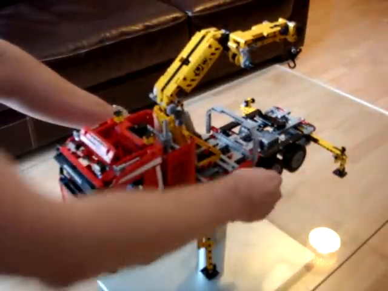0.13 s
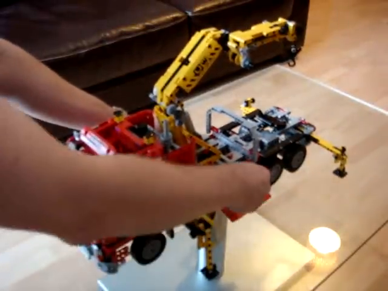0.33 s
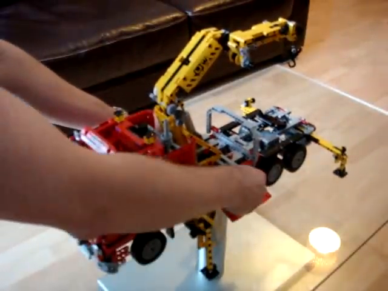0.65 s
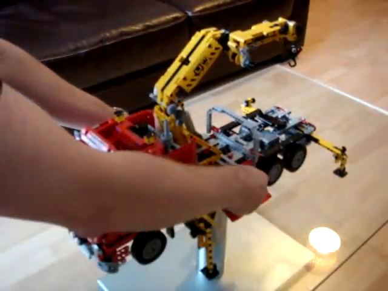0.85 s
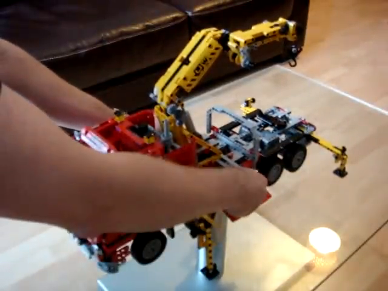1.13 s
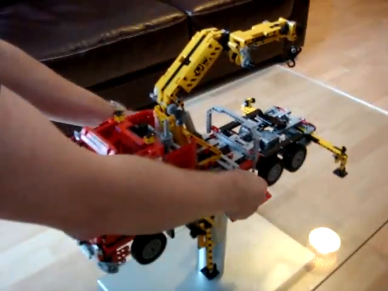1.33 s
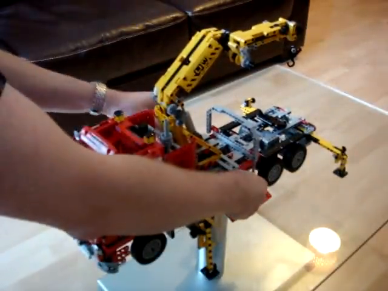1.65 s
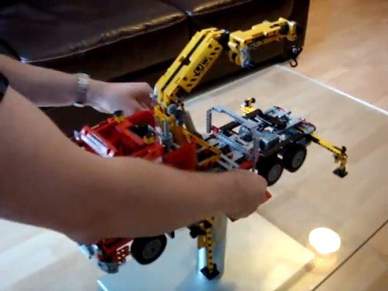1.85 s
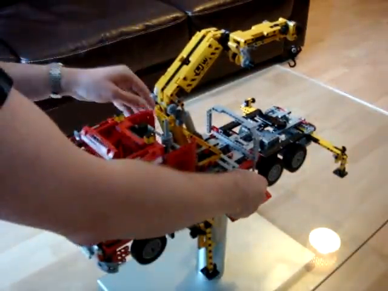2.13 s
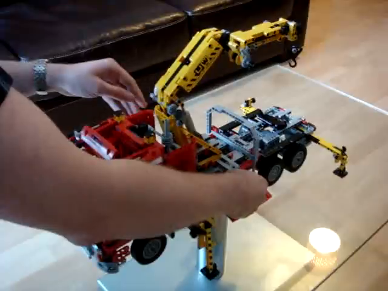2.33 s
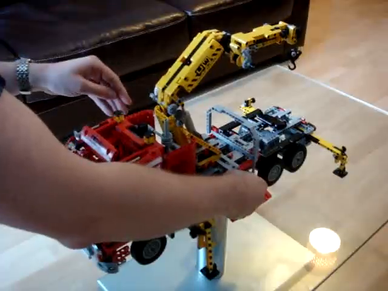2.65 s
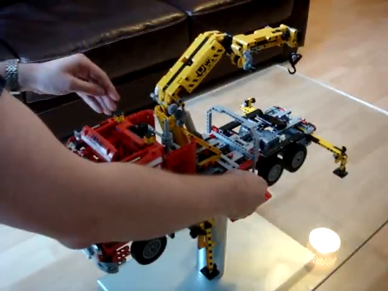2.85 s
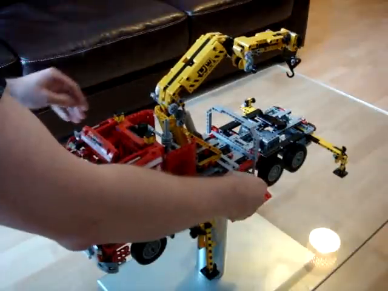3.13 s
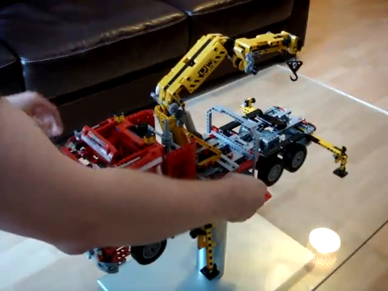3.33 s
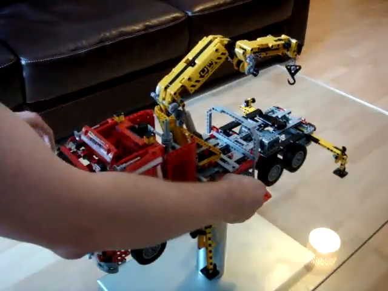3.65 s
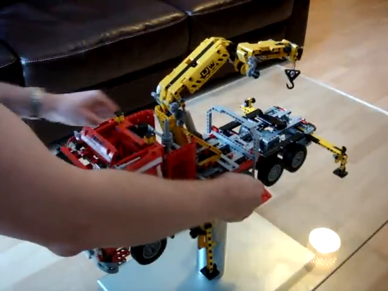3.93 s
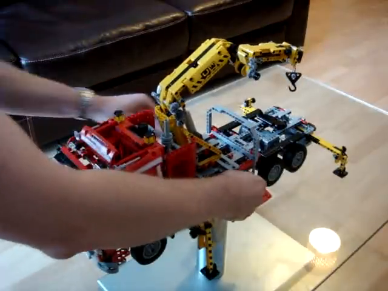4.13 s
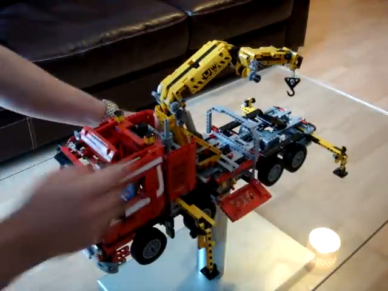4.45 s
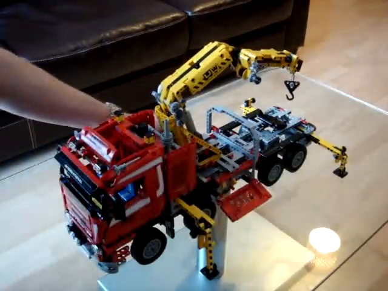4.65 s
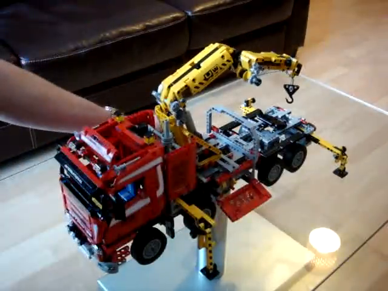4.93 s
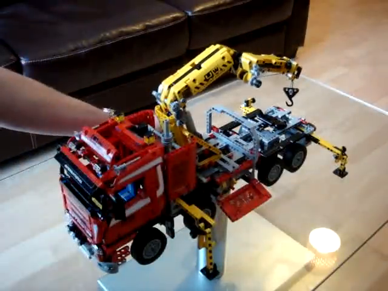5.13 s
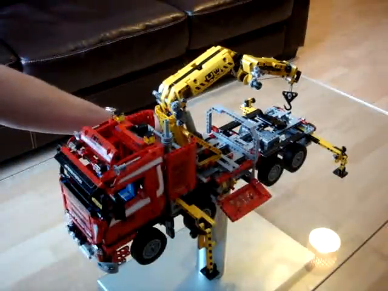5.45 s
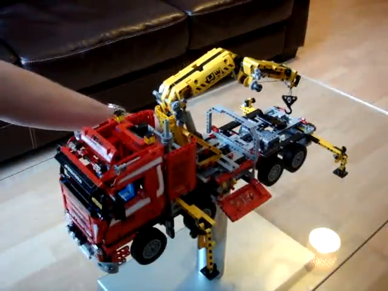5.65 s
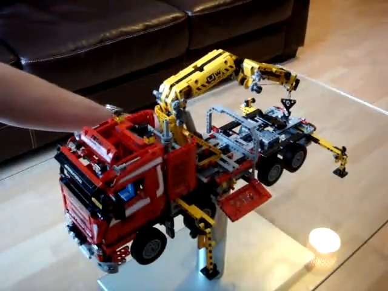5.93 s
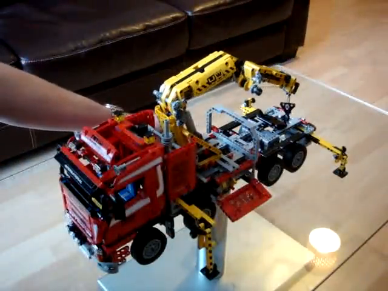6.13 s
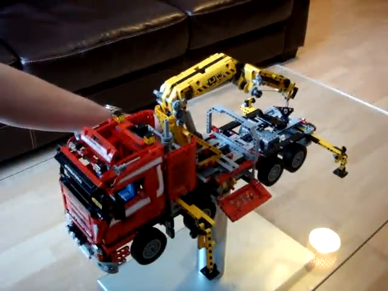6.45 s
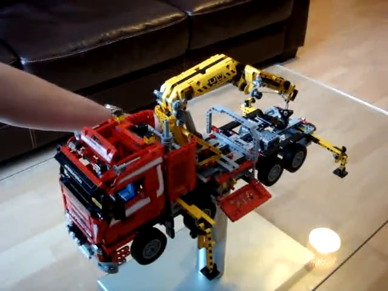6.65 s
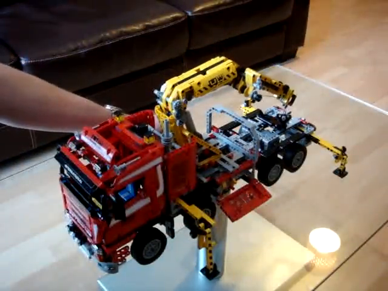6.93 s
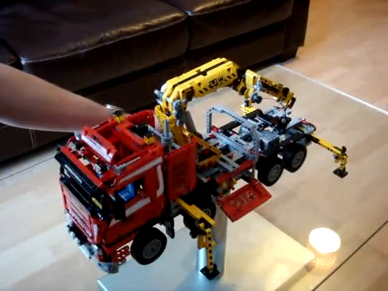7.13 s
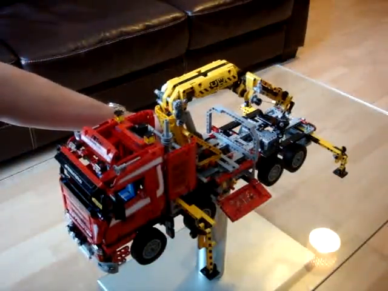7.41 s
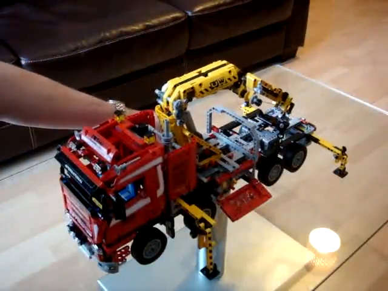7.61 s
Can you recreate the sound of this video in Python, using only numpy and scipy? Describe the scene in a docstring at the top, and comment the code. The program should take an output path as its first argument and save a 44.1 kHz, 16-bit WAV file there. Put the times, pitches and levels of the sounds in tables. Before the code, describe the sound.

In a living room with steady soft hiss and faint hum, an arm rustles and plastic controls knock and tick lightly. After about a second a small toy crane motor jumps to speed, its plastic gears whining and rattling brightly with a surge about twice a second. A dull knock comes midway. At the end the pitch slides down and the drive falls quiet. One close microphone, identical in both channels.

```python
"""A toy crane's small electric motor folds the boom through plastic gears, in a living room.
Over steady hiss and hum: a soft rustle, knocks of filtered noise and faint ticking of the controls.
The motor spins up: tooth-rate harmonics whine, shaft tones drone, tooth clicks and bounces ring the frame.
About twice a second the load eases and bites again; a slow wheel rubs once a turn; two knocks and a thud pass.
At switch-off the gears push the motor and its pitch falls steadily until the drive goes quiet."""
import sys
import numpy as np
from scipy import signal
from scipy.fft import rfft, irfft
from scipy.io import wavfile
from scipy.ndimage import uniform_filter1d

SR = 44100
rng = np.random.default_rng(int(sys.argv[2]) if len(sys.argv) > 2 else 0)


def output_pcm(signal):
    """Save a mono or channel-first signal as 16-bit PCM at the path in sys.argv[1].

    Samples are clipped to [-1, 1] before scaling.
    """
    pcm = np.clip(np.atleast_2d(signal).T, -1, 1) * 32767
    wavfile.write(sys.argv[1], SR, np.round(pcm).astype(np.int16))


N = 343098
T = np.arange(N) / SR
HZ = np.fft.rfftfreq(N, 1 / SR)


def amp(db):
    """Decibels to gain."""
    return 10 ** (np.asarray(db) / 20)


def unit(x):
    """Scales to rms 1."""
    return x / np.sqrt(np.mean(x ** 2) + 1e-20)


def curve(rows):
    """A timed table, interpolated at every sample."""
    return np.interp(T, *np.transpose(rows))


def read(points, hz):
    """A spectrum table, interpolated on a log-frequency axis."""
    table_hz, value = np.transpose(points)
    return np.interp(np.log(hz + 1), np.log(table_hz), value)


def colour(x, gain_db):
    """Filters by a gain given for every frequency."""
    return irfft(rfft(x) * amp(gain_db), N)


def noise():
    """White noise over the whole scene."""
    return rng.standard_normal(N)


def drift(hz):
    """Random wandering of rms 1, low-passed at hz."""
    return unit(signal.sosfilt(signal.butter(2, hz, fs=SR, output="sos"), noise()))


def below(hz, order):
    """Share of each frequency that lies under a soft edge."""
    return 1 / (1 + (HZ / hz) ** order)


# reverberation of the living room: (freq_hz, t60_s)
ROOM_DECAY = [(200, 0.5), (2000, 0.46), (10000, 0.2)]


def room(x, wet_db):
    """Direct sound plus a dense tail whose treble dies first; about the same power."""
    hz, t, spectrum = signal.stft(rng.standard_normal(SR // 2), SR, nperseg=256)
    decay = np.exp(-np.log(1000) * t / read(ROOM_DECAY, hz)[:, None])
    tail = signal.istft(spectrum * decay, SR)[1]
    tail[:SR // 400] = 0  # 2.5 ms gap after the direct sound
    wet = signal.fftconvolve(x, tail / np.linalg.norm(tail))[:N]
    return (x + amp(wet_db) * wet) / np.hypot(1, amp(wet_db))


# load eases, then bites: (start_s, speed_gained_hz, speed_lost_hz, bite_db)
LOAD_EASINGS = [(1.486, 4.46, 0.21, 6), (1.932, 4.03, 0.0, 1), (2.364, 4.7, 0.17, 10),
                (2.825, 3.9, 1.83, 5), (3.35, 4.5, 1.17, 3), (3.8, 3.8, 0.95, 0.262), (4.26, 4.3, 0.7, 0),
                (4.708, 4.63, 1.52, 3.821), (5.185, 3.7, 1.55, 0), (5.636, 3.17, 0.64, 2),
                (6.096, 3.2, 1, 1), (6.554, 4.18, 2, 3), (7.024, 4.16, 2.5, 3)]


def swells(heights, after_s, width_s):
    """One smooth swell at each easing of the load."""
    heights = np.broadcast_to(heights, len(LOAD_EASINGS))
    t = T[::50]  # coarse grid, interpolated back
    total = np.zeros(len(t))
    for (start_s, *_), height in zip(LOAD_EASINGS, heights):
        total += height * np.exp(-((t - start_s - after_s) / width_s) ** 2)
    return np.interp(T, t, total)


# weight of the boom on the drive: (time_s, load_0_to_1)
BOOM_LOAD = [(1, 0.02), (1.5, 0.11), (2.5, 0.16), (2.65, .9), (3.6, 0.99)]
ON_S, SPIN_UP_S = .97, .06
OFF_S, BRAKE_HZ_PER_S = 7.42, 260
FREE_HZ, DRAG_HZ = 121.68, 4.8  # shaft speed with no load; loss at full load
EASE_S, BITE_AFTER_S, BITE_S = .06, .135, .055


def shaft_speed():
    """Turns per second: exponential spin-up, drag of the load, surges and sags, linear braking."""
    _, gained_hz, lost_hz, _ = np.transpose(LOAD_EASINGS)
    cruise_hz = FREE_HZ - DRAG_HZ * curve(BOOM_LOAD)
    cruise_hz = cruise_hz + swells(gained_hz, 0, EASE_S) - swells(lost_hz, BITE_AFTER_S, BITE_S)
    spin_up = 1 - np.exp(-np.maximum(T - ON_S, 0) / SPIN_UP_S)
    brake_hz = BRAKE_HZ_PER_S * np.maximum(T - OFF_S, 0)
    return np.maximum(cruise_hz * spin_up - brake_hz, 1)


def shaft(flutter=.002, flutter_hz=60):
    """Turns of the motor so far; play in the gears makes the speed flutter."""
    return np.cumsum(shaft_speed() * (1 + flutter * drift(flutter_hz))) / SR


def running():
    """Gain that follows the square of the shaft speed: 1 at the fastest, 0 before switch-on."""
    speed_hz = shaft_speed()
    return (speed_hz / speed_hz.max()) ** 2 * (T > ON_S)


def loaded(full_db, unloaded_db):
    """A level that moves with the load."""
    return unloaded_db + (full_db - unloaded_db) * curve(BOOM_LOAD)


SLACK_S = 0.046


def slack(lead_s):
    """Near 1 while the load has eased off the teeth, else 0."""
    return np.tanh(2 * swells(1, -lead_s, SLACK_S))


def slipping(slip_hz_per_s=130):
    """Nears 1 while the speed changes so fast that the teeth lose contact."""
    change_hz_per_s = uniform_filter1d(abs(np.gradient(shaft_speed())) * SR, SR // 20)
    return change_hz_per_s ** 2 / (change_hz_per_s ** 2 + slip_hz_per_s ** 2)


SLOW_RATIO = 36  # shaft turns per turn of the slow wheel
TIGHT_AT_S, TIGHT_SHARPNESS = 4.13, 2


def tight_spot(turns):
    """1 each time the slow wheel rubs at its tight spot, near 0 opposite it."""
    angle = 2 * np.pi * (turns - np.interp(TIGHT_AT_S, T, turns)) / SLOW_RATIO
    return np.exp(TIGHT_SHARPNESS * (np.cos(angle) - 1))


def sets_in(hz, steepness):
    """Gain that rises from 0 towards 1 as the shaft speed passes hz."""
    return 1 / (1 + (hz / shaft_speed()) ** steepness)


# boom sticks and the gears growl: (time_s, growl_db)
BOOM_CATCHES = [(1.5, 4), (1.995, 8), (2.61, 2.5), (2.9, 1), (3.52, 2), (4.11, 1), (4.57, 2.5), (5.04, 4),
                (5.95, 2.5), (6.42, 3.5)]
CATCH_S = 0.048


def catches():
    """Growl in dB while the boom sticks; each sound takes its own share."""
    return sum(db * np.exp(-((T - s) / CATCH_S) ** 2) for s, db in BOOM_CATCHES)


OVERRUN_S = 0.064


def overrun():
    """Rises towards 1 after switch-off, when the gears push the motor on the backs of their teeth."""
    return 1 - np.exp(-np.maximum(T - OFF_S, 0) / OVERRUN_S)


# tooth-rate harmonics 1, 2, 3: (full_load_db, no_load_db, slack_full_load_db, slack_no_load_db,
# slack_lead_s, tight_spot_db, bite_share, overrun_db, onset_shaft_hz, skirt_db, throb_depth_0_to_1)
TOOTH_HARMONICS = [(-60.5, -56, -0.5, -7, .01, 5.5, .1, 0, 96, 0, .4),
                   (-48, -47.5, -1.5, -18, 0.039, 0, 0.13, 4, 82, -7, 0.3),
                   (-43.5, -55, -14, 2, .003, 2, 1, -12, 102, -10, 0.1)]
TEETH, WHEEL_RATIO = 10, 8  # pinion teeth; shaft turns per turn of the off-centre wheel
SEAT_S, PRESS_AFTER_S, PRESS_S = 0.073, 0.068, .04


def whine(turns, rough=0.38, rough_hz=45, skirt_hz=140, slip_blur=0.44, slip_break=0.27,
          onset_steepness=14, wander_db=1.33, wander_hz=8):
    """Tooth-rate harmonics follow the load; uneven teeth roughen each and spread a fuzzy skirt round it."""
    slip, tight = slipping(), tight_spot(turns)
    seated = 1 - np.exp(-np.maximum(T - ON_S, 0) / SEAT_S)  # teeth settle into contact
    bite_db = swells(np.transpose(LOAD_EASINGS)[3], PRESS_AFTER_S, PRESS_S) + catches()
    tones = np.zeros(N)
    for k, row in enumerate(TOOTH_HARMONICS, 1):
        (full_db, unloaded_db, slack_db, unloaded_slack_db, lead_s, tight_db,
         bite_share, overrun_db, onset_hz, skirt_db, throb) = row
        level_db = loaded(full_db, unloaded_db)
        level_db = level_db + loaded(slack_db, unloaded_slack_db) * slack(lead_s)
        level_db = level_db + tight_db * tight + bite_share * bite_db + overrun_db * overrun()
        level_db = level_db + wander_db * drift(wander_hz)
        carrier = np.exp(2j * np.pi * k * TEETH * turns)
        wheel = np.cos(2 * np.pi * (turns / WHEEL_RATIO + rng.random()))
        # slipping breaks up the higher harmonics most
        line = (1 + throb * wheel + rough * drift(rough_hz)) / (1 + slip_break * k * slip)
        fuzz = (drift(skirt_hz) + 1j * drift(skirt_hz)) / np.sqrt(2)
        skirt = np.hypot(amp(skirt_db), slip_blur * k * slip) * fuzz
        tone = (carrier * (line + skirt)).real / np.hypot(1, amp(skirt_db))
        tones += amp(level_db) * sets_in(onset_hz, onset_steepness) * tone
    return np.sqrt(2) * room(tones * seated, wet_db=-14)


# gear click strength: (full_load_db, no_load_db, slack_db, overrun_db, onset_shaft_hz, steepness)
BRIGHT_CLICKS = (-36.5, -38.5, -1, -2, 80, 3.5)
# strength of the dull part of the same gear rattle, below about 3 kHz: (full_load_db, no_load_db, slack_db,
# overrun_db, onset_shaft_hz, steepness)
DULL_RATTLE = (-47.8, -50, -.5, 2, 59, 3)
SLACK_LEAD_S = 0.024


def rattle_gain(full_db, unloaded_db, slack_db, overrun_db, onset_hz, steepness, catch_share=0.13):
    """Strength of one part of the rattle, from the speed and the load."""
    onset = sets_in(onset_hz, steepness)
    level_db = loaded(full_db, unloaded_db) + slack_db * slack(SLACK_LEAD_S)
    level_db = level_db + overrun_db * overrun() + catch_share * catches()
    return amp(level_db) * onset / onset.max()


# off-centre gears: (shaft_turns_per_gear_turn)
OFF_CENTRE_RATIOS = (1, 4 / 3, 2, 4, 6)


def wobble(turns):
    """Off-centre gears press and release once in each of their turns; rms 1."""
    return unit(sum(np.cos(2 * np.pi * (turns / ratio + rng.random())) for ratio in OFF_CENTRE_RATIOS))


def impacts(turns, scatter_db=2.5, slop_teeth=.3, bounce_db=-2, bounces_per_s=1500):
    """One click a tooth, early or late by the backlash, and loose parts bouncing between them."""
    teeth = np.flatnonzero(np.diff(np.floor(TEETH * turns)))
    late, force = rng.standard_normal((len(teeth), 2)).T
    at = teeth + slop_teeth * late * SR / (TEETH * shaft_speed()[teeth])
    clicks = np.zeros(N)
    clicks[np.clip(at, 0, N - 1).astype(int)] = amp(scatter_db * np.clip(force, -2, 1))
    bounces = rng.uniform(-1.21, 1, N) * (rng.random(N) < bounces_per_s / SR)
    return clicks + amp(bounce_db) * bounces


# broad radiation slope of the plastic frame: (freq_hz, gain_db)
FRAME_SLOPE = [(30, -40), (120, -34), (250, -16.5), (500, -11), (1000, -6.5), (1800, -2.5), (2800, -6),
               (4000, -2), (5200, -1.5), (7800, -4.5), (9900, 2)]
# frame resonances on that slope: (freq_hz, width_hz, gain_db)
FRAME_RESONANCES = [(457, 18, 10.2), (1132, 57, 7.5), (1570, 15, 2.3), (1844, 28, 5.8), (2045, 38, 2.7),
                    (2264, 800, 6.6), (3195, 113, 6.2), (3716, 840, 10.4), (4230, 130, 3.6),
                    (4630, 130, 3.2), (5780, 470, 5.65), (6888, 920, 13.25), (7343, 625, 8.9),
                    (8345, 540, 8.6), (8770, 790, 4.7), (9320, 140, 4.7)]


def frame_response():
    """Relative radiation of the plastic frame in dB: slope plus resonance peaks."""
    peaks_db = sum(db / (1 + (2 * (HZ - hz) / width_hz) ** 2) for hz, width_hz, db in FRAME_RESONANCES)
    return read(FRAME_SLOPE, HZ) + peaks_db


# gearbox buzz band: (low_hz, high_hz)
BUZZ_EDGES_HZ = (3550, 4300)
BUZZ_TIGHT_DB, BUZZ_UNLOADED_DB, BUZZ_SLIP_DB = 3, 0, 4.5


def rattle(turns, count=4, clump_db=0.5, clump_hz=110, wobble_db=0.2, sway_db=1.13, sway_hz=70,
           split_hz=3000, buzz_db=-1.1, catch_share=0.39):
    """Gears chatter in clumps and ring the frame; dull and bright parts each follow their own strength."""
    # each gear has its own tooth phase and path through the room
    blows = sum(room(impacts(turns + rng.random()), wet_db=5) for _ in range(count))
    blows = blows / np.sqrt(uniform_filter1d(blows ** 2, SR // 5) + 1e-9)  # even out over 0.2 s
    chatter_db = clump_db * drift(clump_hz) + wobble_db * wobble(turns)
    ring = rfft(blows * amp(chatter_db)) * amp(frame_response())
    bright_rms = irfft(ring * (HZ > 4500) * (HZ < 10000), N).std()
    dull_rms = irfft(ring * (HZ > 1300) * (HZ < 2150), N).std()

    low_hz, high_hz = BUZZ_EDGES_HZ
    dull_share = below(split_hz, order=8)
    buzz_share = (1 - dull_share) * (below(high_hz, order=40) - below(low_hz, order=40))
    fizz_share = 1 - below(7800, order=30)
    click_share = 1 - dull_share - buzz_share - fizz_share

    # the contact point wanders: main resonances and top fizz sway separately
    clicks = irfft(ring * click_share, N) * amp(sway_db * drift(sway_hz))
    fizz = irfft(ring * fizz_share, N) * amp(sway_db * drift(sway_hz))
    strain_db = loaded(0, BUZZ_UNLOADED_DB) + BUZZ_TIGHT_DB * tight_spot(turns) + BUZZ_SLIP_DB * slipping()
    buzz = irfft(ring * buzz_share, N) * amp(buzz_db + strain_db + catch_share * catches())
    bright = (clicks + fizz + buzz) / bright_rms * rattle_gain(*BRIGHT_CLICKS)
    dull = irfft(ring * dull_share, N) / dull_rms * rattle_gain(*DULL_RATTLE)
    return (bright + dull) * (T > ON_S)


# weaker drive tones: (shaft_multiple, full_load_db, no_load_db, resonance_hz, width_hz)
DRIVE_TONES = [(5 / 3, -67.5, -71.5, 201.3, 10.6), (3, -68.5, -69.5, 361, 32), (4, -71, -68, 461, 31),
               (6, -63, -66, 720.5, 35), (7, -56.5, -65.5, 839.5, 20.5), (31, -55.5, -51.5, 3781, 127.5),
               (40.5, -59, -65, 4633.5, 100.5), (37, -46, -59, 3701, 401),
               (71.5, -57.5, -67, 8245.5, 249.5)]


def drone(turns, waver=0.26, waver_hz=14):
    """Weaker shaft tones slide on and off their resonances as the speed swings."""
    speed_hz, tones = shaft_speed(), np.zeros(N)
    for multiple, full_db, unloaded_db, resonance_hz, width_hz in DRIVE_TONES:
        response = 1 / np.hypot(1, 2 * (multiple * speed_hz - resonance_hz) / width_hz)
        tone = np.cos(2 * np.pi * multiple * turns) * (1 + waver * drift(waver_hz))
        tones += amp(loaded(full_db, unloaded_db)) * response * tone
    return np.sqrt(2) * room(tones * running(), wet_db=-12)


def band_db(hz, width_hz):
    """Gain of one broad resonance at every frequency, falling away on both sides."""
    detune = (HZ - hz ** 2 / (HZ + 1)) / width_hz
    return -20 * np.log10(1 + detune ** 2)


# rustle of an arm moving past: (time_s, level_db)
RUSTLE_LEVEL = [(0, -52), (.06, -52.5), (.14, -51.5), (.21, -55.5), (.26, -60), (.33, -60), (.4, -85)]
# rustle spectrum: (freq_hz, relative_db)
RUSTLE_SPECTRUM = [(100, -23.5), (350, -11.5), (520, -8.5), (690, -0.5), (900, -7.5), (2000, -9.5),
                   (4000, -10.5), (7000, -11.5), (10000, -22)]


def rustle():
    """An arm moves past: coloured noise under a level curve."""
    return unit(colour(noise(), read(RUSTLE_SPECTRUM, HZ))) * amp(curve(RUSTLE_LEVEL))


# ticking of the controls under the fingers: (time_s, level_db)
CONTROL_TICKING = [(.33, -85), (.38, -62), (.55, -62.5), (.75, -66), (.9, -63), (.98, -78)]
# knocks of handled plastic: (start_s, level_db before halving, centre_hz, width_hz, t60_s)
PLASTIC_KNOCKS = [(.117, -52, 3000, 5000, .02), (.229, -40, 1500, 3000, .02), (0.417, -43, 920, 700, .05),
                  (.51, -48, 1800, 1500, 0.067), (4.975, -47, 520.2, 400, .2),
                  (5.137, -36.5, 597, 230, 0.14), (5.15, -52, 290, 80, .14)]


def handling(ticks_per_s=110, tick_hz=4500, tick_width_hz=7000):
    """Controls tick as sparse filtered impulses; handled plastic knocks as decaying band noise."""
    ticks = rng.uniform(.4, 1, N) * (rng.random(N) < ticks_per_s / SR)
    out = unit(colour(ticks, band_db(tick_hz, tick_width_hz))) * amp(curve(CONTROL_TICKING))
    for start_s, level_db, centre_hz, width_hz, t60_s in PLASTIC_KNOCKS:
        decay = np.exp(-np.log(1000) * np.maximum(T - start_s, 0) / t60_s) * (T >= start_s)
        out += .5 * amp(level_db) * decay * unit(colour(noise(), band_db(centre_hz, width_hz)))
    return room(out, wet_db=-5)


# room hiss spectrum: (freq_hz, relative_db)
AIR_SPECTRUM = [(18, -60), (30, -24.5), (205, -12), (242, -9.5), (325, -8.5), (366, -5.5), (434, -5.5),
                (610, -7.5), (1040, -8), (1120, -7.5), (1460, -11), (9980, -17.5), (13000, -51),
                (22000, -120)]
# mains hum: (freq_hz, rms_db)
MAINS_HUM = [(100, -77.5), (200, -82.5)]
AIR_RMS_DB = -57.5


def room_tone():
    """Steady coloured hiss and a faint mains hum of pure tones."""
    hum = sum(amp(db) * np.sqrt(2) * np.sin(2 * np.pi * hz * T) for hz, db in MAINS_HUM)
    return hum + amp(AIR_RMS_DB) * unit(colour(noise(), read(AIR_SPECTRUM, HZ)))


def scene():
    """Everything reaches one microphone, alike in both channels."""
    turns = shaft()
    mono = whine(turns) + rattle(turns) + drone(turns) + rustle() + handling() + room_tone()
    return np.array([mono, mono])


EDGE_HZ = 10080


def record(dry):
    """The recorder's steep low-pass band limit."""
    low_pass = signal.firwin(1023, EDGE_HZ, window=("kaiser", 9), fs=SR)
    return signal.oaconvolve(dry, low_pass[None], "same")


dry = scene()
out = record(dry)
output_pcm(out)
```